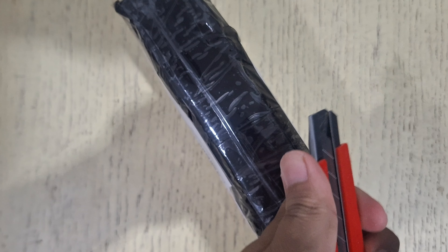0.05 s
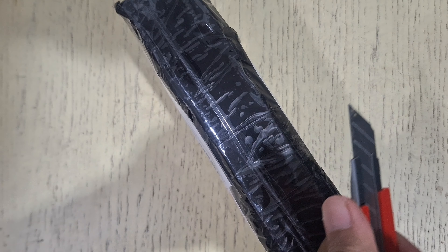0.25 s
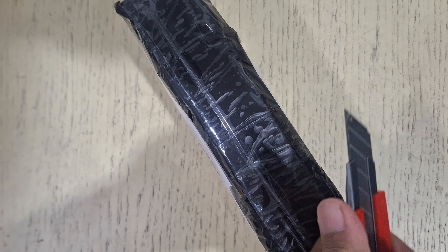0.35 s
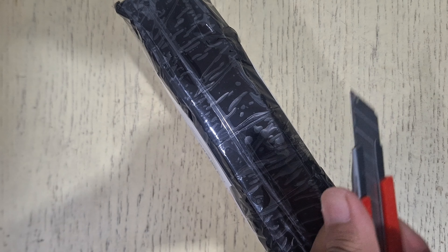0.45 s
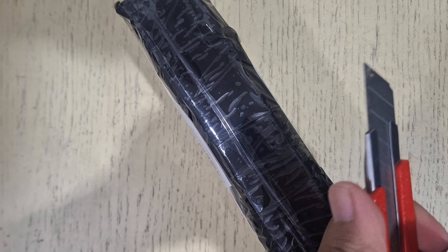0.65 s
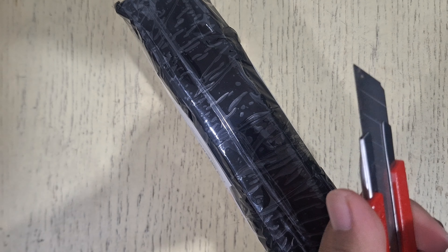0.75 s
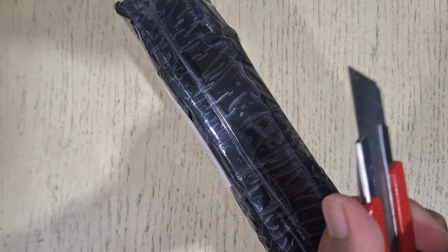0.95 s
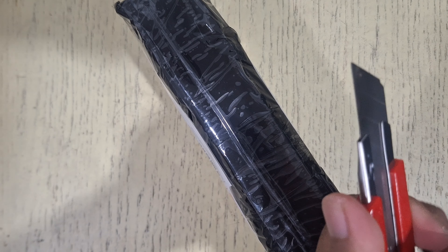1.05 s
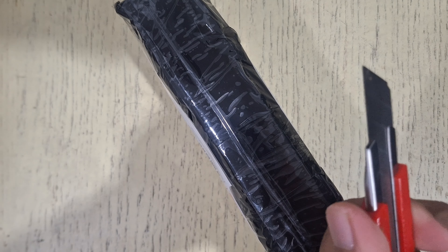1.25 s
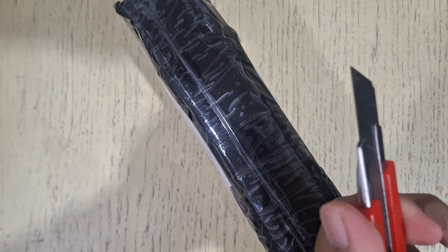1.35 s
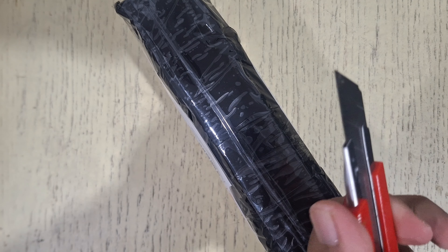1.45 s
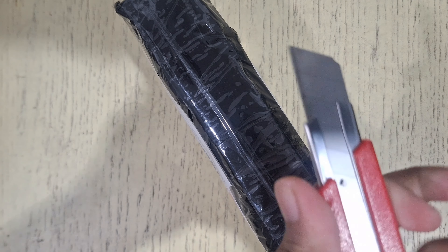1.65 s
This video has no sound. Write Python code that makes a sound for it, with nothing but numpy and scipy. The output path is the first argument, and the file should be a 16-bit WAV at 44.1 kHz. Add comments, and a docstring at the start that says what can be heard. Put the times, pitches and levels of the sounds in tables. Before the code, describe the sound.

A craft knife blade slides out with a short scrape and a string of metallic clicks.

```python
"""First comes a short, rattling scrape: a thumb shoves a craft knife's blade along its steel channel.
Then comes a string of clicks as the slider's spring drops into the notches one by one, each a snap
with a short metallic ring. The knife is close by, above a table in a quiet room.
The room answers with a brief echo over a low hum."""
import sys
import numpy as np
from scipy import signal
from scipy.fft import rfft, irfft
from scipy.io import wavfile
from scipy.ndimage import uniform_filter1d

SR = 44100
rng = np.random.default_rng(int(sys.argv[2]) if len(sys.argv) > 2 else 0)


def to_wav(sig):
    """Store sig (one row per channel, or 1-D mono) as 16-bit WAV at the path in sys.argv[1].

    Samples outside -1..1 are clipped; the rate is SR.
    """
    pcm = np.clip(np.atleast_2d(sig), -1, 1) * 32767
    pcm = np.round(pcm).astype(np.int16)
    wavfile.write(sys.argv[1], SR, pcm.T)  # frames by channels


N = 74970
T = np.arange(N) / SR
HIT_T = T[:4096]  # seconds since a hit
EAR_T = HIT_T - np.array([[0.00008], [0]])  # tones reach the left side a little later
ATTACK_S = 0.00076  # how quickly a hit builds up


# Each row: start in seconds, snap level in dB, snap brightness in dB per octave, spring pitch in Hz,
# spring level in dB, spring's base swell time in ms, handle pitch in Hz, handle level in dB,
# blade level in dB, how much louder spring, handle and blade are on the left in dB.
NOTCHES = [ (0.5316, -15.5, 2, 2680, -18, 1.7, 2145, -12.5, -38, 3),
           (0.5695, -11, 0, 2810, -15, 0.94, 2177, -10, -36, 4.5),
           (0.6060, -16.5, 1, 2690, -11.5, 1.24, 2130, -9, -40, 1.5),
           (0.639, -14, 0, 2643, -10.5, 1.96, 2146, -12.5, -33, 1),
           (0.6993, -11, -3, 2712, -5.5, 2.64, 2230, -28, -38, 2),
           (0.7755, -9.5, -1.5, 3033, -8, 2.1, 2130, -24, -39, -5),
           (0.8105, -10, -3, 2976, -7.5, 2, 2230, -38, -27, -1),
           (0.9111, -13.5, 0.5, 3030, -8, 1.7, 2030, -24, -19, -4.5),
           (0.9978, -10, 0.5, 2982, -11.5, 1.07, 2000, -14.5, -21, 4),
           (1.3012, -14.5, -1.5, 2893, -17.5, 2, 1985, -16, -23, 2.5),
           (1.3542, -12.5, .5, 2682, -19, 2.3, 1930, -17.5, -26, 0),
           (1.416, -11, 0.5, 2966, -15, 1.6, 1980, -15.5, -29, 1.5),
           (1.6868, -50.5, 11, 3640, -32.5, 0.81, 1900, -31, -60, -1)]

def ratchet():
    """The clicks: each notch snaps, rings the spring and the blade, and knocks the handle."""
    out = np.zeros((2, N))
    for (at, snap_db, tilt_db, spring_hz, spring_db, swell_ms,
         handle_hz, handle_db, blade_db, left_db) in NOTCHES:
        add(out, at, amp(snap_db) * snap(tilt_db))
        add(out, at, amp(snap_db) * steel_ping())
        ringing = amp(spring_db) * spring(spring_hz, swell_ms)
        ringing += amp(handle_db) * handle(handle_hz)
        ringing += amp(blade_db) * blade()
        add(out, at, ringing * pan(left_db))
    return out


# The snap's tone colour. Each row: frequency in Hz, boost or cut in dB.
SNAP_COLOUR = [(150, -19), (600, -21.5), (1400, -16.5), (2000, -6.5), (3000, 6), (4200, -5.5), (6000, -8.5),
               (7900, -25.5), (9300, -16.5), (10800, -28.5), (13400, -24.5), (15100, -6.5), (16500, -31.5)]

def snap(tilt_db):
    """The spring lands in a notch with a sharp crack."""
    return amp(3.5) * colour(crack(tilt_db, decay_s=0.0036), SNAP_COLOUR)


# Each row: pitch in Hz, level in dB, ring time in seconds (the time to fade by 60 dB).
STEEL_TONES = [(4240, -9, 0.011), (5240, -5.5, 0.011), (6096, -12, 0.019), (14100, -19, 0.0074)]

def steel_ping():
    """The snap sets off the steel spring's high tones."""
    return ring(STEEL_TONES)


# Each row: pitch in Hz, level in dB, ring time in seconds.
SPRING_OVERTONES = [(9080, -18.5, 0.011), (9600, -19, 0.01), (14630, -11, 0.0092), (15300, -13, .008)]

def spring(hz, swell_ms):
    """The spring's main tone swells and dies within milliseconds while its overtones ring."""
    peak_ms = swell_ms * np.array([[1.25], [0.55]])  # slower on the left, quicker on the right
    age = HIT_T * 1000 / peak_ms
    swell = (age * np.exp(1 - age)) ** 1.59
    return swell * np.sin(2 * np.pi * hz * EAR_T) + ring(SPRING_OVERTONES)


# Each row: multiple of the handle's pitch, level in dB, ring time in seconds.
HANDLE_TONES = [(.96, -0.5, .015), (1.05, -8, 0.025), (1.22, -26, 0.003), (1.88, -7, 0.014)]

def handle(hz):
    """The knocked handle gives a short clack."""
    return ring(HANDLE_TONES, hz)


# Each row: pitch in Hz, level in dB, ring time in seconds.
BLADE_TONES = [(2865, -4, 0.11), (3007, -6.5, .09), (3150, -6.5, 0.077)]

def blade():
    """The free blade rings on after the click."""
    return ring(BLADE_TONES)


# Each row: start in seconds, level in dB, brightness in dB per octave.
KNOCKS = [(0.2073, -30, -0.5), (0.2207, -28, 1), (0.2408, -1.5, 1.5), (0.2520, -13, -0.5),
          (0.2572, -11, 1.5), (0.2664, -14, 1.5), (0.2807, -5.5, -4), (0.2826, -3, 2.5), (0.2845, -5.5, 4),
          (0.2886, -1.5, -2), (0.2908, -7, 1.5)]
# The steel channel's tone colour. Each row: frequency in Hz, boost or cut in dB.
CHANNEL_COLOUR = [(150, -18.5), (500, -22.5), (900, -15), (1220, -6.5), (1550, -8), (2200, 4.5), (3000, -2),
                  (4800, -6), (6500, -24.5), (8000, -27), (10000, -22.5), (12500, -37), (15200, -14),
                  (16500, -41.5)]

def rattle():
    """The slider races over the notches during the first shove, in a quick run of knocks."""
    out = np.zeros((2, N))
    for at, db, tilt_db in KNOCKS:
        add(out, at, amp(db) * crack(tilt_db, decay_s=0.0024))
    return amp(3) * colour(out, CHANNEL_COLOUR)


# The scrape's tone colour. Each row: frequency in Hz, boost or cut in dB.
SCRAPE_COLOUR = [(200, -31), (900, -19.5), (1500, -13.5), (2200, 0.5), (3300, -5), (4400, -6), (5500, -7),
                 (7000, -16), (8500, -29.5), (12500, -33), (15200, -16), (16500, -44)]
# The blade's edge squeals at full speed. Each row: pitch in Hz, level in dB, ring time in seconds.
SQUEAL_TONES = [(4120, 2, 0.037), (4665, 3, 0.025), (5140, -8, 0.039)]
# How loud the slide, the squeal and the thumb are. Each row: time in seconds, level in dB.
SLIDE_LEVEL = [(.17, -82), (.2, -48.5), (.228, -38.5), (.245, -28), (.253, -16.5), (.263, -17), (.276, -21),
               (.292, -21), (.303, -57), (.32, -93)]
SQUEAL_LEVEL = [(.244, -39), (.253, -13.5), (.260, -27.5), (.271, -31.5), (.28, -42)]
THUMB_LEVEL = [(0, -69.5), (.17, -72), (.6, -66), (1.12, -63), (1.16, -54), (1.25, -72.5), (1.55, -61),
               (1.64, -67.5), (1.7, -52)]

def friction():
    """Tiny grains of sliding make a scrape, a brief squeal and the thumb's faint rub on the slider."""
    grains_per_s, spread_db = 12000, 2.5
    grain_starts = rng.random(N) < grains_per_s / SR
    strength = amp(spread_db * rng.standard_normal(N))
    grains = grain_starts * strength * rng.standard_normal((2, N))
    scrape = unit(colour(grains, SCRAPE_COLOUR))
    squeal = unit(signal.fftconvolve(grains, ring(SQUEAL_TONES), axes=1)[:, :N])
    return (level(SLIDE_LEVEL) + level(THUMB_LEVEL)) * scrape + level(SQUEAL_LEVEL) * squeal


# How long the echo lasts. Each row: frequency in Hz, seconds to fade by 60 dB.
ECHO_FADE = [(200, 0.17), (1000, 0.3), (3000, 0.37), (6000, 0.37), (15000, 0.31)]
# The echo's tone colour. Each row: frequency in Hz, boost or cut in dB.
ECHO_COLOUR = [(300, 2), (900, 3), (2000, -1), (3000, 1), (6000, -1), (12000, 1.5)]

def room(sound):
    """The room throws back a cluster of early echoes and a smooth tail whose bass dies first."""
    hz, times, bands = signal.stft(rng.standard_normal((2, N)), SR, nperseg=256)
    fade = np.exp(-np.log(1000) * times / along(ECHO_FADE, hz)[:, None])
    tail = signal.istft(bands * fade, SR)[1][:, :N]
    tail *= np.clip(T / 0.0023 - 1, 0, 1)  # waits 2.3 ms, then fades in
    early_start_s, early_decay_s = 0.0085, 0.015
    early = rng.standard_normal((2, N)) * (T > early_start_s) * np.exp(-T / early_decay_s)
    echo = (amp(-9) * even(tail) + amp(-13) * even(early)) / np.sqrt(N)
    return colour(signal.fftconvolve(sound, echo, axes=1)[:, :N], ECHO_COLOUR)


# The air's tone colour. Each row: frequency in Hz, boost or cut in dB.
AIR_COLOUR = [(15, -25.5), (25, -1.5), (59, 0), (149, -6.5), (236, -13), (363, -19), (560, -22),
              (659, -20.5), (1130, -29.5), (1740, -30), (2280, -34.5), (2480, -33.5), (16000, -81)]

def air():
    """The room's air is a soft, deep rush, with its bass much alike in both ears."""
    shared = colour(rng.standard_normal((1, N)), AIR_COLOUR)
    width = colour(rng.standard_normal((1, N)), AIR_COLOUR)
    width = colour(width, [(80, -12), (1040, -2)]) / np.std(shared)
    return amp(-46) * (unit(shared) + width * np.array([[1], [-1]])) * pan(left_db=2.5)


# Each row: pitch in Hz, level at the start in dB, level at the end in dB.
HUM_TONES = [(62.7, -45.5, -50.5), (130.8, -48, -52.5), (168.8, -54.5, -57), (208, -76, -52)]

def hum():
    """A few low tones waver at random, a little louder on the left."""
    waver_hz = 7.2
    keep_slow = np.exp(-(np.fft.rfftfreq(N, 1 / SR) / waver_hz) ** 2)
    out = 0
    for hz, start_db, end_db in HUM_TONES:
        swell, drift = unit(irfft(rfft(rng.standard_normal((2, N))) * keep_slow, N))
        phase = 2 * np.pi * hz * T
        tone = unit((1 + swell) * np.sin(phase) + drift * np.cos(phase))
        out += amp(np.linspace(start_db, end_db, N)) * tone
    return out * pan(left_db=4)


def crack(tilt_db, decay_s):
    """Two hard parts meet in a burst of noise, partly alike on the left and right."""
    noise = rng.standard_normal((3, len(HIT_T)))
    likeness = 0.34
    stereo = np.sqrt(likeness) * noise[2] + np.sqrt(1 - likeness) * noise[:2]
    fade = np.exp(-HIT_T / decay_s)
    shape = fade * (1 - np.exp(-HIT_T / ATTACK_S))
    spectrum = rfft(stereo * shape)
    burst = irfft(spectrum / np.abs(spectrum)) * np.sqrt(shape)  # all frequencies about equally loud
    burst *= np.sqrt(np.sum(fade ** 2) / np.sum(burst ** 2, axis=1, keepdims=True))
    return colour(burst, [(750, -2 * tilt_db), (6000, tilt_db)])  # brighten or darken around 3 kHz


def ring(tones, pitch=1):
    """A struck part rings with fading tones, tuned a little differently at every blow."""
    out = 0
    for hz, db, ring_s in tones:
        detune = 1 + 0.012 * rng.standard_normal()
        cycles = pitch * hz * detune * EAR_T + rng.random()
        fade = np.exp(-np.log(1000) * HIT_T / ring_s)
        out += amp(db) * np.sin(2 * np.pi * cycles) * fade
    return out * (1 - np.exp(-HIT_T / ATTACK_S))


def amp(db):
    """Turn decibels into a number to multiply by."""
    return 10 ** (np.asarray(db) / 20)


def pan(left_db):
    """Make the left side this much louder than the right."""
    return amp(np.array([[left_db], [-left_db]]) / 2)


def unit(x):
    """Scale a sound to an average power of 1."""
    return x / np.sqrt(np.mean(x ** 2))


def level(points):
    """Join (seconds, dB) points into a volume curve, silent outside them."""
    return amp(np.interp(T, *np.array(points).T, left=-120, right=-120))


def along(points, hz):
    """Read between (Hz, value) points, with octaves evenly spaced."""
    freqs, values = np.array(points).T
    return np.interp(np.log(hz + 1), np.log(freqs), values)


def colour(x, points, size=8192):
    """Boost or cut a sound's frequencies along (Hz, dB) points."""
    gains = amp(along(points, np.fft.rfftfreq(size, 1 / SR)))
    cepstrum = irfft(np.log(gains))
    cepstrum[1:size // 2] *= 2  # folded so the filter never sounds ahead of a hit
    cepstrum[size // 2 + 1:] = 0
    response = irfft(np.exp(rfft(cepstrum)))
    return signal.fftconvolve(x, response[None], axes=1)[:, :N]


def even(echo, width_hz=163):
    """Even out an echo's broad peaks and dips in tone."""
    spectrum = rfft(echo)
    power = uniform_filter1d(np.abs(spectrum) ** 2, int(width_hz * N / SR) + 1)
    return unit(irfft(spectrum / np.sqrt(power), N) * (T < T[-1] / 2))


def add(out, at, sound):
    """Mix a sound in at a time in seconds."""
    start = int(at * SR)
    out[:, start:start + sound.shape[1]] += sound[:, :max(N - start, 0)]


def scene():
    """The knife, its echo and the quiet background."""
    knife = rattle() + friction() + ratchet()
    return knife + room(knife) + air() + hum()


def record(dry):
    """Peaks stop at full scale and the treble above 16200 Hz is cut."""
    treble_cut = signal.ellip(8, .2, 70, 16200, fs=SR, output="sos")
    return signal.sosfilt(treble_cut, np.clip(dry, -1, 1))


dry = scene()
out = record(dry)
to_wav(out)
```